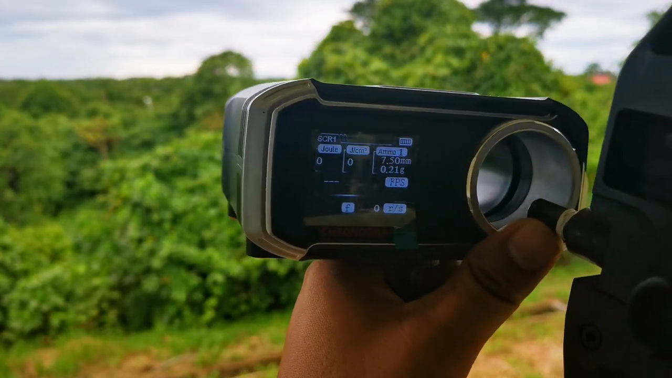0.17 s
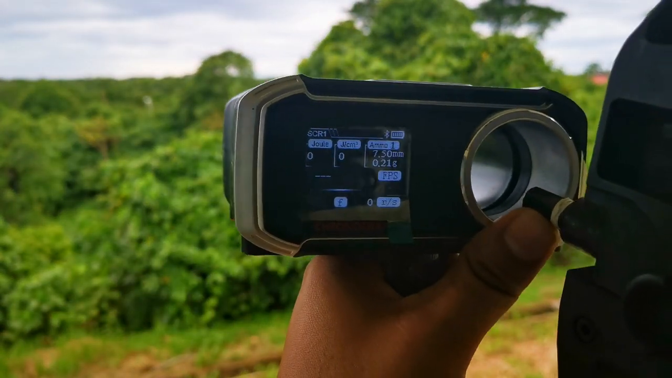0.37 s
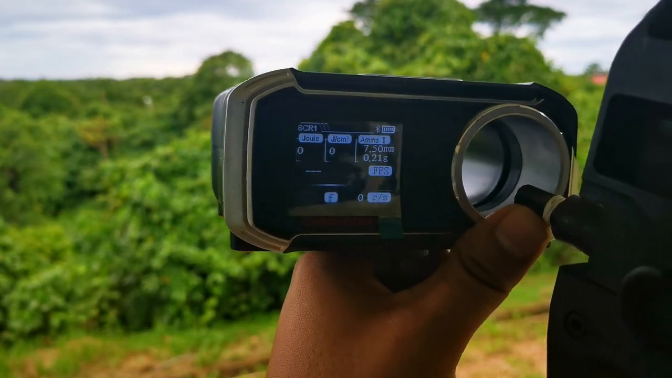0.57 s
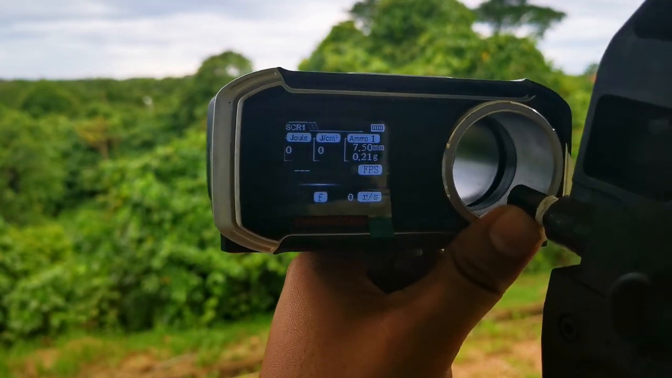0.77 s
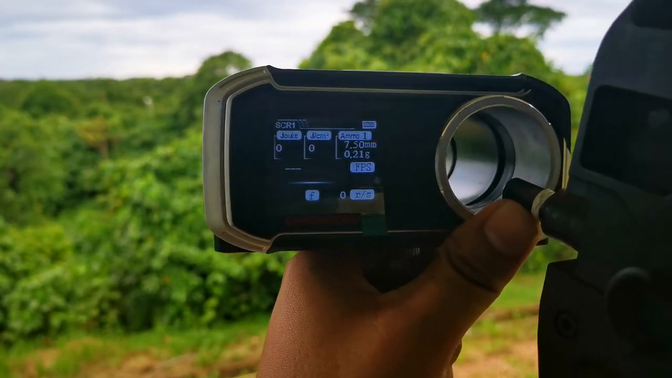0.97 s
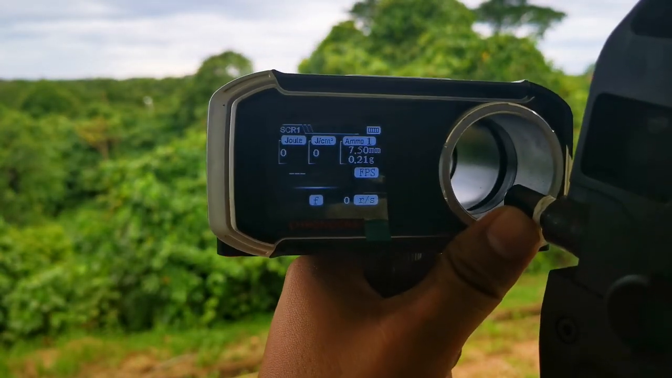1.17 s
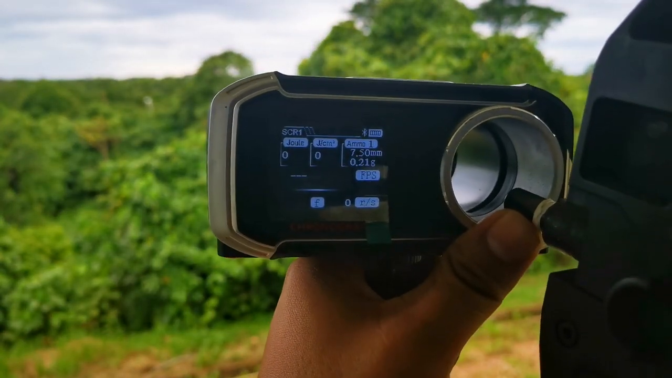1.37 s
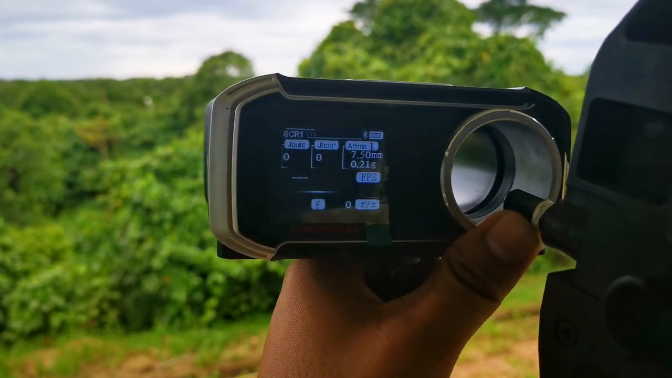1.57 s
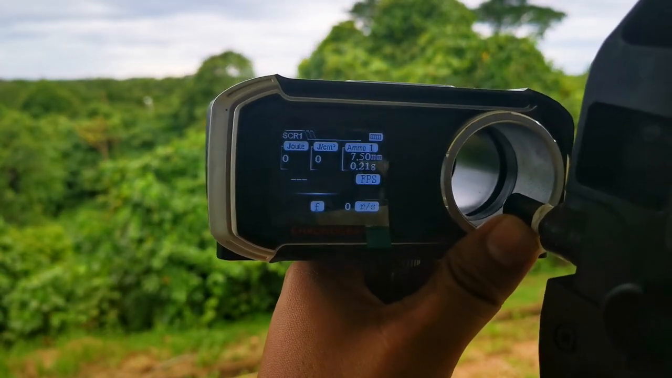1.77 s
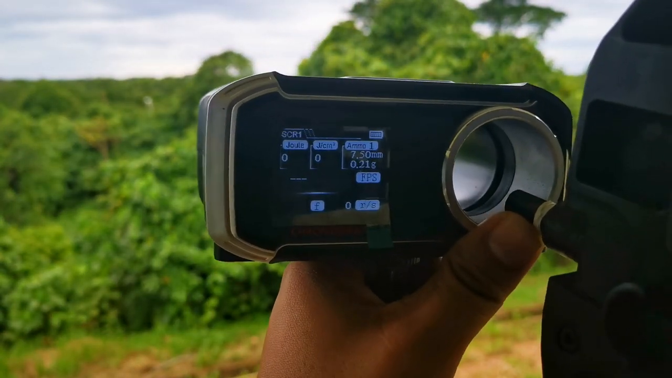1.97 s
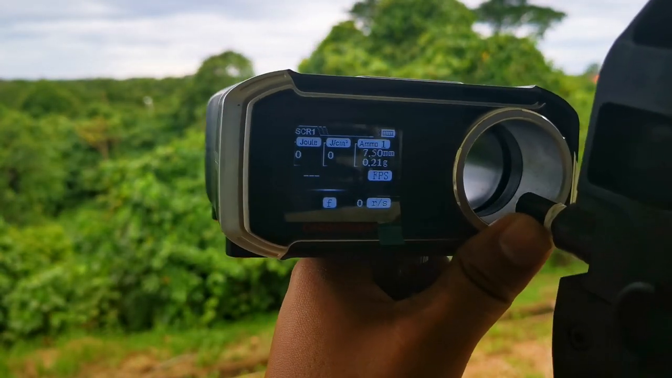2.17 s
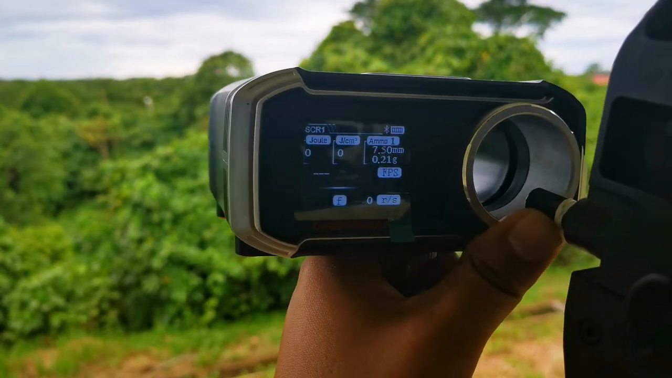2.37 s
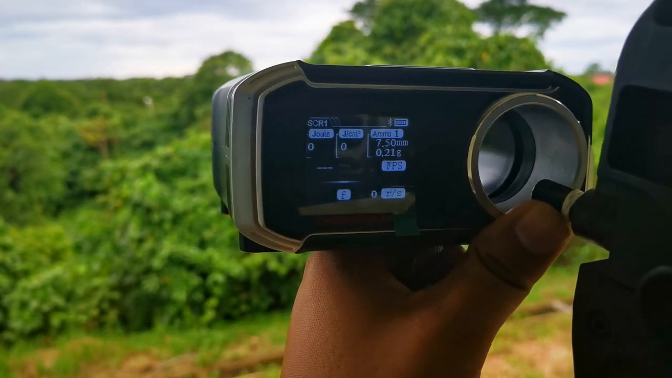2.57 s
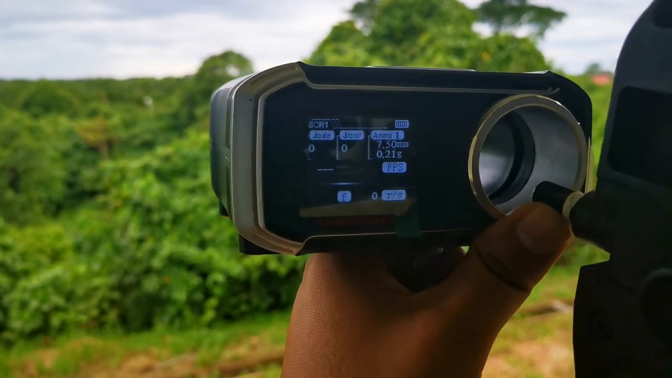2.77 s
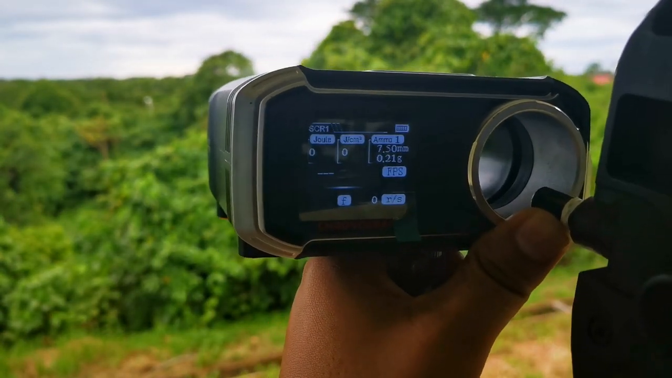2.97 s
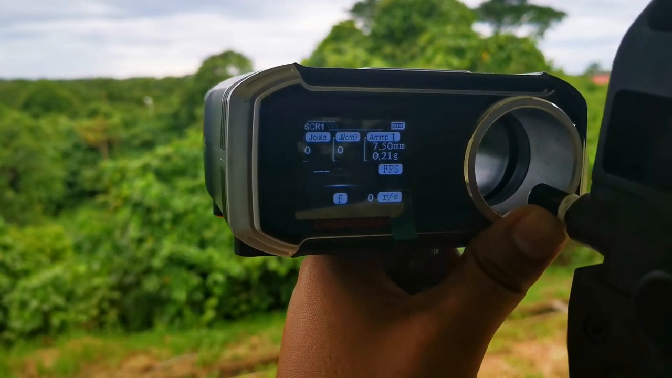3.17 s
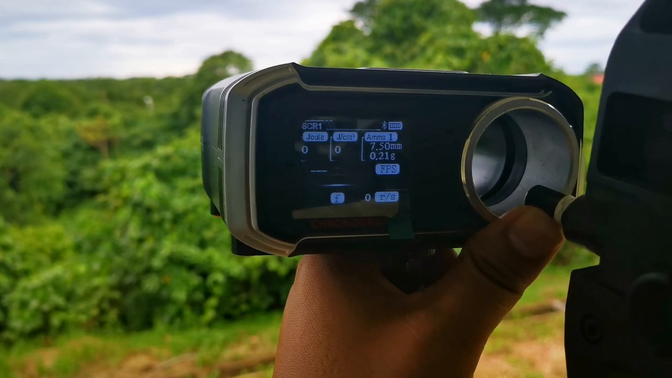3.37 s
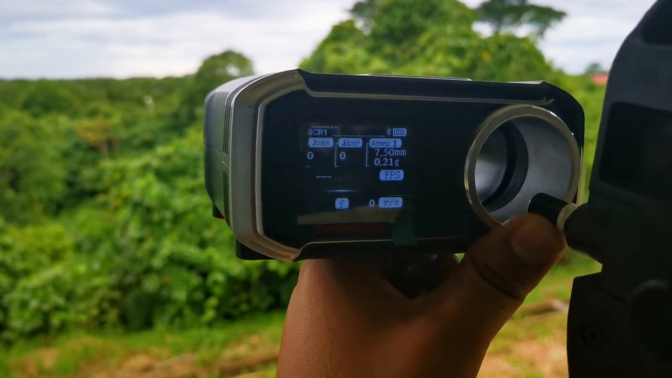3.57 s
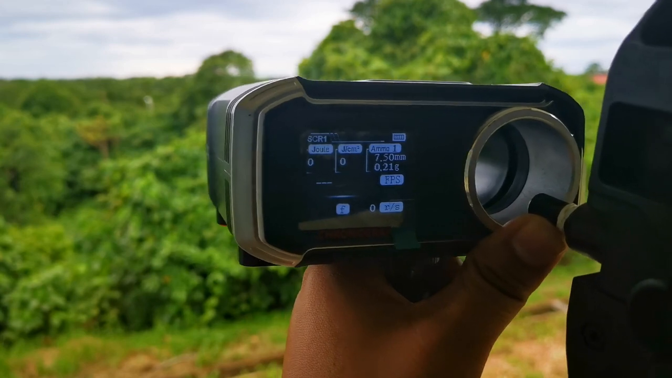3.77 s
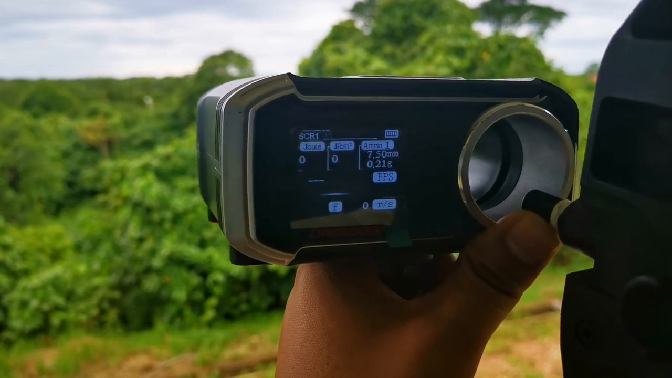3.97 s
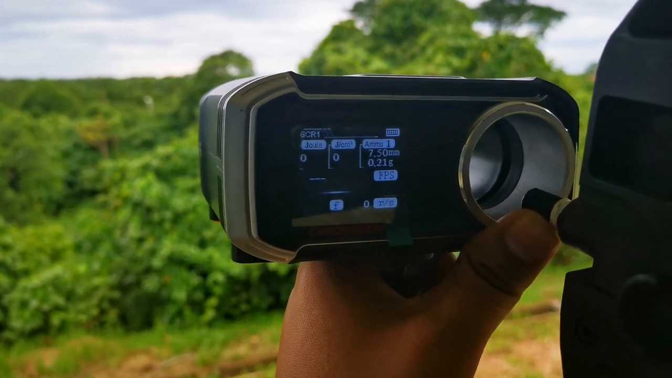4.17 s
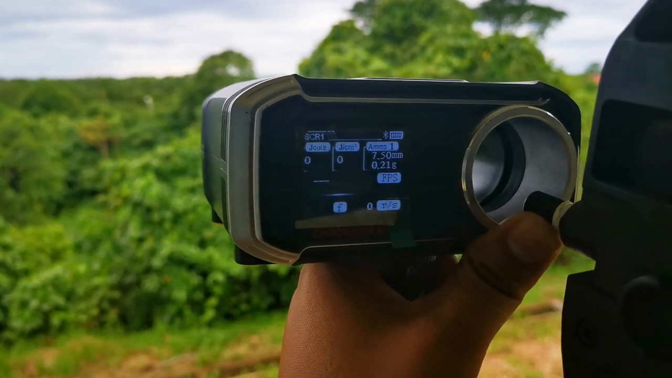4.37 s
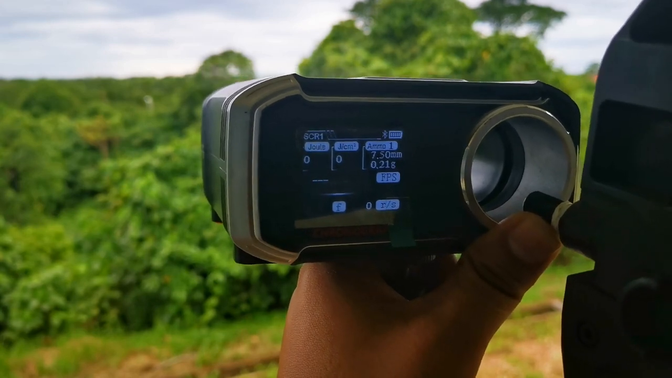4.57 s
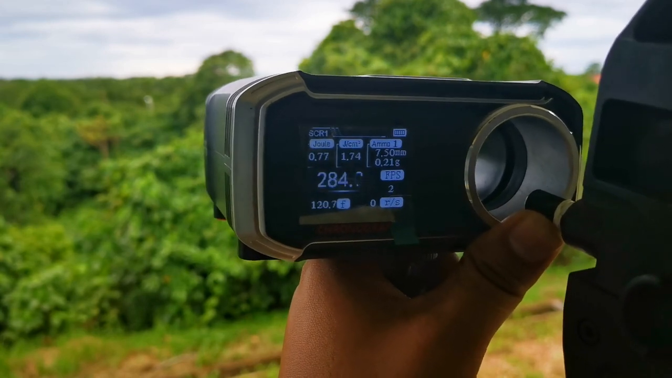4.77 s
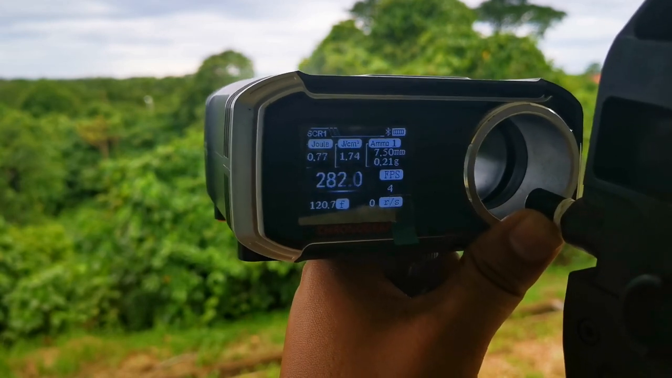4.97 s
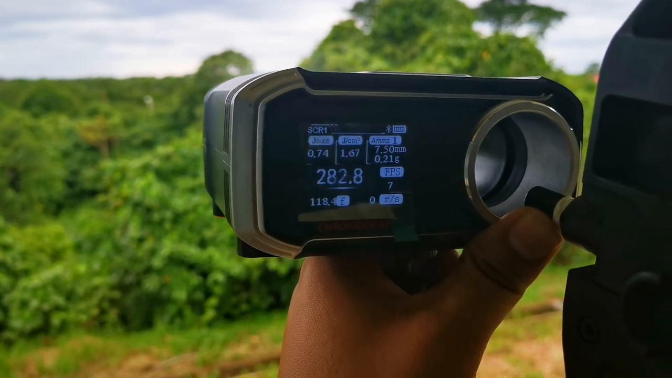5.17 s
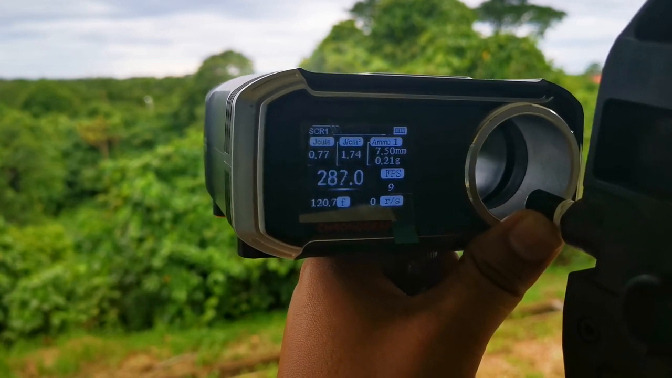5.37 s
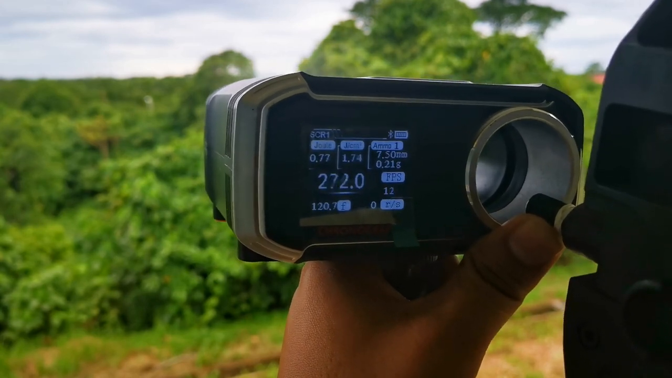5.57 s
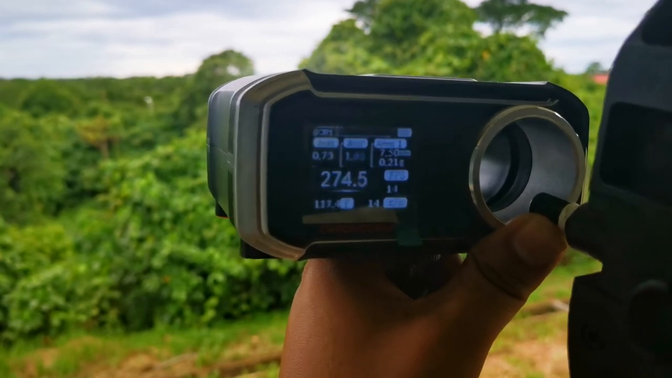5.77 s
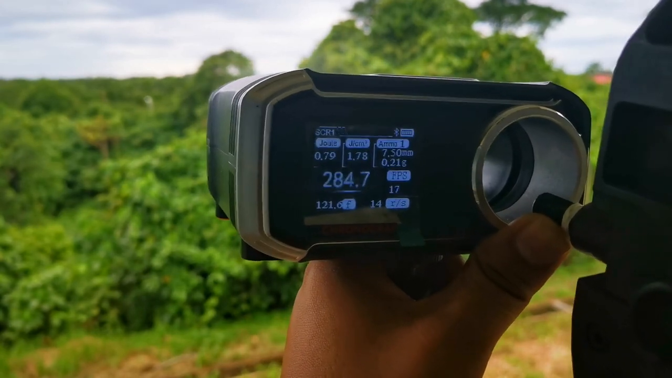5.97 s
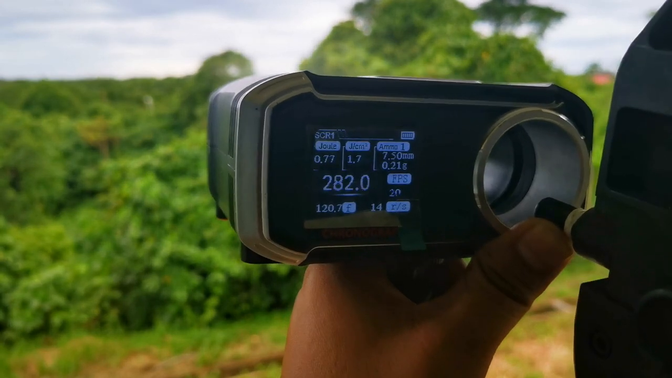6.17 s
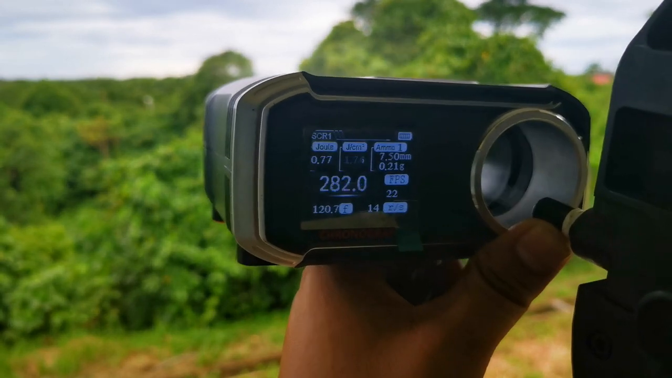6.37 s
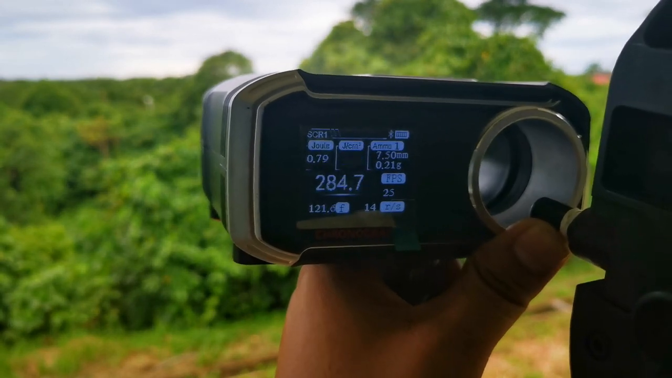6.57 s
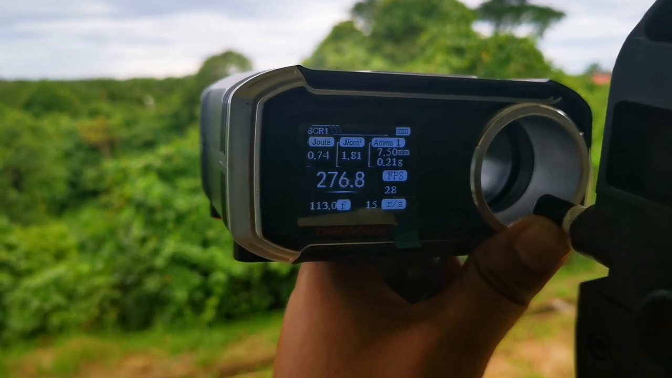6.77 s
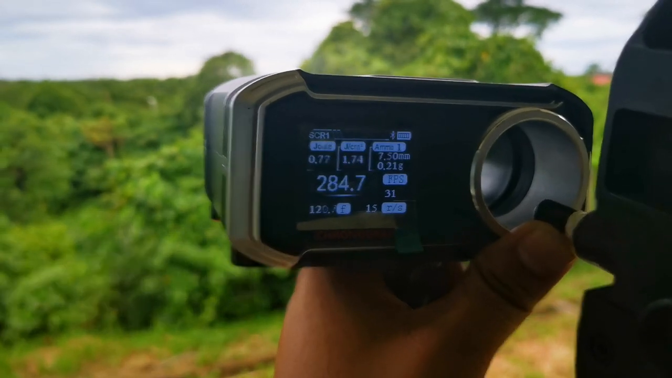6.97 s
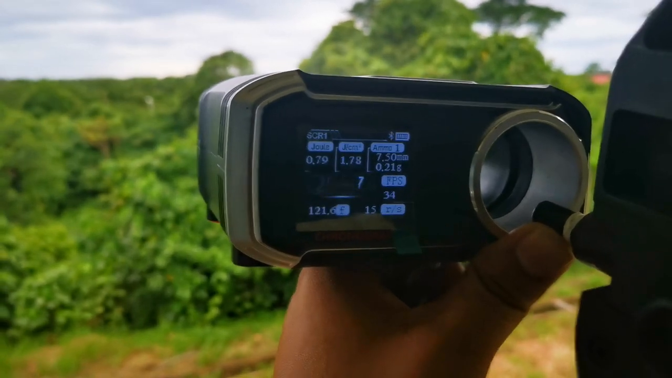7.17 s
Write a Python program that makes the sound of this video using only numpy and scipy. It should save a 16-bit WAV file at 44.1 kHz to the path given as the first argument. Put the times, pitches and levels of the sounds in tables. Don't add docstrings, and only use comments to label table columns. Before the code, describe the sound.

Calm leafy ambience with cicadas and far-off hammering, a few small plastic clicks, then rattling automatic toy blaster fire with whining gears, slightly weakening.

```python
import sys
import numpy as np
from scipy import signal
from scipy.fft import rfft, irfft, next_fast_len
from scipy.io import wavfile
from scipy.ndimage import uniform_filter1d

SR = 44100
rng = np.random.default_rng(int(sys.argv[2]) if len(sys.argv) > 2 else 0)


def volts(x):
    e = np.asarray(x, float) / 20
    return 10 ** e


def unload_audio(sound):
    columns = np.transpose(np.atleast_2d(sound))
    steps = np.round(np.clip(columns, -1, 1) * 32767)
    wavfile.write(sys.argv[1], SR, steps.astype(np.int16))


N = 317961
T = np.arange(N) / SR

# frequency in Hz, level in dB, 60 dB decay in s.
BARREL_MODES = [(2010, 10.5, 0.015), (2910, 8.5, 0.01), (3186, 2, 0.032), (3700, 7, 0.0073),
                (4600, 5, 0.02), (5310, 4.5, 0.023), (7460, -35, 0.021), (7900, -54, .008)]
# frequency in Hz, level in dB, 60 dB decay in s.
EMPTY_BARREL_MODES = [(1840, 5, 0.017), (2100, 12.5, 0.0048), (2894, 3.5, 0.017), (3440, -1.5, 0.028),
                      (5230, -6, 0.0055), (6760, -29, 0.0074)]
# frequency in Hz, level in dB, 60 dB decay in s.
SHELL_MODES = [(250, -22.5, 0.096), (302, -11, 0.082), (401.6, -1, 0.057), (489.3, -8, 0.13),
               (950, 11.5, 0.0054), (1585, -1.5, 0.015), (2280, -6.5, 0.0062)]
# delay after the crack in s, level in dB.
REBOUNDS = [
    (0.0118, -10),
    (0.0222, -27),
    (.048, -14.5),
]
# start in s, level in dB, frequency in Hz, cycles to die.
START_CLICKS = [(4.5083, -20, 5460, 40), (4.5116, -11, 795, 4.4), (4.5126, -12, 800, 7.4),
                (4.515, -12.5, 393, 9.1), (4.5245, -18, 900, 9), (4.5276, -28, 6600, 30),
                (4.529, -14, 1250, 12), (4.5285, -12, 420, 6.7), (4.532, -15.5, 498, 5),
                (4.5308, -12, 850, 6.5), (4.533, -7, 950, 5.5), (4.5372, -12, 1200, 14),
                (4.542, -16, 900, 10), (4.5466, -24, 3300, 20), (4.5465, -10, 323, 5.5),
                (4.5505, -18, 2900, 25)]
# crack time in s, delay to the slam in ms
# (under 2.1 the barrel is empty), then levels of crack, slam and recoil in dB.
OPENING_SHOTS = [
    (4.5549, 1.66, -5, -4, -30),
    (4.6311, 1.444, -5, -5.5, -34),
    (4.6919, 1.7, -8.5, -8, -34),
    (4.7513, 2.6, -12, -10, -28.5),
    (4.8084, 1.28, -8, -7.5, -35),
    (4.866, 1.62, -12, -7.5, -33),
    (4.9246, 2.8, -12.5, -9.5, -28),
    (5.0222, 2.97, -8.5, -8, -28),
    (5.0967, 2.6, -12.5, -9, -27.5),
    (5.1572, 3, -13.5, -9.5, -28),
]
# number of turns, ms per turn.
PACE = [
    (6, 57.62),
    (6, 57.93),
    (5, 57.7),
    (3, 58.0),
    (14, 58.35),
]
# crack, slam, recoil in dB.
STEADY_DB = [-13, -11, -31]
# crack, slam, recoil in dB per s.
SAG_DB_PER_S = [-2.0, -3, -2.5]
# crack in dB, slam in dB.
BALLS = [(-0.7, 2), (1, -1.5), (0.3, 1), (1.2, -1.5), (-1, 0.7), (-1.6, -1.5), (-2.5, .7), (-1, 1.5),
         (-0.6, -1.5), (-2.5, -4), (-3, .4), (-1.6, 0.7), (-.9, 0.5), (-0.9, 1.5), (0.5, 1.5), (-0.5, 1.1),
         (0, 0.7), (-0.8, -2), (-0.5, 1.5), (1.5, -1.5), (.1, 0), (-0.2, 0), (0.8, -5), (0.5, 0.8),
         (-2.5, 2.5), (.1, 2.5), (0, 1), (-3, -6), (1.3, -1.5), (-2.5, 0.7), (-0.5, -3), (0.8, -9), (-1, 3),
         (-1, 3.5), (0.5, 3.5)]
# time in s, gearbox level in dB, speed as a factor.
MOTOR = [(4.506, -60, 0.23), (4.521, -32, .45), (4.549, -22.5, .7), (4.58, -25, .81), (4.62, -27, .87),
         (4.665, -26.5, 0.99), (4.76, -26, .99), (4.941, -27, 0.94), (4.985, -33.5, 0.55),
         (5.03, -25.5, 0.8), (5.085, -27.5, .87), (5.14, -26.5, 0.97), (7.21, -29, 1.07)]
# centre as share of the turn, spread, level in dB.
PINION_LOAD = [(.46, 0.11, 0.5), (.74, 0.089, -3)]
# centre as share of the turn, spread, frequency in Hz, glide in Hz per turn, level in dB.
WHINES = [(.03, 0.049, 1620, 150, -4.5), (.36, .08, 1350, -420, -5.5), (.76, 0.12, 1240, -450, -4.5),
          (.72, 0.13, 950, -330, -6), (.78, 0.041, 2100, -59, -8.5), (0.49, 0.14, 3370, -400, -15.5),
          (.4, 0.096, 850, -300, -10), (0.32, 0.064, 390, -59.5, -3.5)]
# time in s, spread in s, frequency in Hz, level in dB.
GROANS = [
    (4.597, 0.019, 850, -25.5),
    (4.603, .014, 1125, -27.5),
    (4.612, 0.0068, 370, -26),
    (5.066, .016, 1125, -29),
    (5.06, 0.012, 670, -29),
    (5.058, .009, 2000, -29),
    (5.045, .012, 350, -26.5),
]
# frequency in Hz, level in dB per Hz.
GRIND = [(60, -18), (150, -16), (260, -9.5), (450, -7.5), (950, -9.5), (1400, -13), (1700, -9), (2100, -18),
         (3200, -14.5), (3800, -21.5), (6000, -71), (8000, -52)]
# frequency in Hz, level in dB per Hz.
HISS = [(2500, -9), (4000, -6), (5000, -5), (6100, -8.5), (6900, -1), (7700, 0), (8400, -9), (10000, -13),
        (15000, -2)]
# frequency in Hz, phase by which the left leads in radians.
PORT_LEAD = [(60, 0), (1200, -.4), (2100, -.55), (3400, -1.1), (4500, -1.6), (5700, -1.9), (6400, -.3),
             (15000, 0)]
# frequency in Hz, half the left-right difference in dB.
PORT_DB = [(60, 0), (500, 0), (1300, -1.1), (2800, 0.34), (5500, 0.5), (9000, -0.4), (14000, 0.5)]
# start in s, length in s, frequency in Hz, level in dB, width in Hz.
BIRDS = [(1.727, .27, 4000, -80, 9.3), (1.979, .125, 3980, -63.5, 9), (2.0, .08, 4380, -78, 60),
         (2.486, 0.17, 1730, -67.5, 110), (2.761, 0.14, 1570, -59.5, 13), (2.744, 0.11, 3700, -66, 500),
         (2.76, 0.087, 2450, -64, 350), (3.439, 0.13, 1630, -61.5, 110), (3.501, 0.31, 1660, -68, 150),
         (0, 0.53, 920, -64.5, 140), (0, 0.28, 2000, -65, 850), (0.997, 0.26, 2350, -67, 480),
         (3.943, .06, 3960, -71, 30), (4.098, 0.12, 3030, -69, 50), (4.21, .08, 4150, -74, 100)]
# time in s, level in dB, frequency in Hz.
TICKS = [(2.1965, -45, 3700), (2.1973, -50, 3000), (2.198, -49, 4180), (2.207, -56, 4100),
         (2.775, -47, 3900), (2.774, -52, 5200), (2.778, -49, 2500), (3.07, -58, 2300), (3.25, -64, 2300),
         (4.31, -44, 1000), (4.311, -48, 2200), (4.424, -39, 950), (4.424, -38.5, 2480)]
# time in s, level in dB, frequency in Hz.
KNOCKS = [
    (1.3195, -40, 1650),
    (1.3302, -26, 1660),
    (1.3372, -36, 2000),
    (0.9, -47, 1460),
]
# time in s, frequency in Hz.
WING_WHINE = [(0.0, 13620), (0.055, 13740), (0.16, 12660), (0.26, 12900), (0.37, 12030)]
# time in s, knock in dB, wall echo in dB.
BLOWS = [
    (0.002, -49, -54),
    (.12, -75, -67),
    (.31, -63.5, -63),
    (0.436, -52.5, -62.5),
    (0.892, -44, -57),
    (1.03, -64, -76),
    (1.319, -46, -72),
    (1.331, -44, -50.5),
    (2.5, -69, -79),
    (2.764, -60, -69),
]
# frequency in Hz, level in dB per Hz.
BLOW_SPECTRUM = [(290, -54), (500, -17.5), (840, -4), (1410, -1.5), (1680, -1), (1920, -7), (2930, -22),
                 (3160, -19), (5490, -34), (7000, -35), (9100, -57), (15400, -120)]
# frequency in Hz, level in dB per Hz.
ECHO_SPECTRUM = [(1800, -31), (2600, -4), (4000, -7), (6500, -9), (8500, -14), (9200, -60)]
# frequency in Hz, width in Hz, level in dB.
CICADAS = [(7000, 210, -24), (7240, 120, 4), (7576, 630, 9.5), (7880, 37, -5.5), (8090, 160, -13.5)]
# frequency in Hz, level in dB per Hz.
LEAVES = [(59, -43), (100, 1), (156, -3), (247, -7), (480, -10), (560, -16), (838, -18), (1670, -22.5),
          (2300, -27), (4130, -33.5), (4760, -37.5), (6900, -41), (8970, -46), (15200, -120)]
# frequency in Hz, correlation.
LIKENESS = [(60, 0.9), (180, 0.97), (550, 0.92), (1650, 0.83), (4970, 0.13), (15000, 1)]
# frequency in Hz, width in Hz, level in dB; the first is the drone.
HUMS = [(153.3, 7.9, -9), (228, 3.7, -11.5), (296.7, 8.6, -10), (441.3, 13, -9)]
# time in s, spread in s, frequency in Hz, level in dB.
SWELLS = [
    (.3, 0.19, 79.6, -59.5),
    (.9, 0.088, 154.5, -57.5),
    (1.65, 0.1, 153.3, -55),
    (2.071, .07, 150.8, -47.5),
    (2.349, .2, 228.3, -56.5),
    (3.05, 0.076, 144.6, -53),
    (3.66, .08, 150.4, -60),
    (4.0, .12, 142.5, -54),
    (4.27, .06, 170, -49.5),
]
# time in s, level in dB.
GUSTS = [(.1, -65), (.88, -70), (1.1, -64), (1.75, -67), (1.94, -64), (2.18, -68), (2.45, -67), (3.12, -62),
         (3.5, -68), (3.88, -62), (4.05, -64), (4.27, -58), (4.42, -61)]
# frequency in Hz, gain in dB.
FIELD_TREBLE = [(20, 0), (8450, 0), (8900, -25), (16000, -40)]
# frequency in Hz, gain in dB.
MICROPHONE = [(20, -1), (8200, -0.5), (9500, -5.5), (11000, -13.5), (15000, -26.5), (15600, -32),
              (15900, -76)]

STEADY_S = 5.2157
RUSH_FROM, PUFF_FADE = 0.914, 0.029
PINION_HZ, PINION_SAG_HZ, PINION_FREE = 1722, 680, .3
MUZZLE_S, MUZZLE_DB = 0.00013, -0.5
JOLT_HZ, JOLT_DB, FIRST_JOLT_DB, BRACED_S = 43.4, -17, 12, .4
DROOP_HZ = 25


def evened(x):
    return x / np.sqrt(np.mean(x ** 2) + 1e-20)


def read(points, hz):
    f, value = np.transpose(points)
    return np.interp(np.log(hz + 1), np.log(f + 1), value)


def add(mix, s, sound):
    part = mix[round(s * SR):][:len(sound)]
    part += sound[:len(part)]


def bump(x, centre, spread):
    return np.exp(-.5 * ((x - centre) / spread) ** 2)


def colour(x, points):
    size = next_fast_len(x.shape[-1])
    gain = volts(read(points, np.fft.rfftfreq(size, 1 / SR)))
    return evened(irfft(rfft(x, size) * gain, size)[..., :x.shape[-1]])


def resonate(x, hz, width):
    turn = np.exp(2j * np.pi * np.cumsum(hz * np.ones(len(x))) / SR)
    r = np.exp(-np.pi * width / SR)
    return 2 * (turn * signal.lfilter([1 - r], [1, -r], x / turn)).real


def ring(modes, detune, scatter_db, rise):
    t = T[:2400]
    hz, db, t60 = np.transpose(modes)[:, :, None]
    luck = rng.standard_normal((2, len(modes), 1))
    decay = volts(db + scatter_db * luck[0] - 60 * t / t60)
    x = (decay * np.cos(2 * np.pi * hz * (1 + detune * luck[1]) * t)).sum(0)
    x = x * (1 - np.exp(-(t + 1 / SR) / rise))
    return x / abs(x).max()


def wander(rate):
    width = int(SR / rate)
    return evened(uniform_filter1d(uniform_filter1d(rng.standard_normal(N), width), width))


def wide(points, patchy_db, size=N):
    frames, hz = size // 256 + 5, np.fft.rfftfreq(1024, 1 / SR)
    a, b, c, d, patches = rng.standard_normal((5, frames, 513), dtype=np.float32)
    patches = evened(uniform_filter1d(uniform_filter1d(patches, 8, 1), 14, 0))
    same = np.clip(read(LIKENESS, hz), -1, 1).astype(np.float32)
    left = a + 1j * b
    z = np.array([left, same * left + np.sqrt(1 - same ** 2) * (c + 1j * d)])
    z = z * volts(read(points, hz) + patchy_db * patches).astype(np.float32)
    return evened(signal.istft(z, nperseg=1024, noverlap=768, time_axis=1, freq_axis=2)[1][:, :size])


def firing():
    turns, ms = np.transpose(PACE)
    s = STEADY_S + np.cumsum(np.r_[0, np.repeat(ms, turns.astype(int))]) / 1000
    luck = rng.standard_normal((len(s), 2))
    db = STEADY_DB + np.outer(s - s[0], SAG_DB_PER_S) + np.c_[BALLS, .3 * luck[:, 0]]
    return np.r_[OPENING_SHOTS, np.c_[s, 3.15 + .25 * luck[:, 1], db]]


def shots(rows):
    out, t = np.zeros(N), T[:4000]
    swing = np.sin(2 * np.pi * 120.5 * t) - .45 * np.sin(2 * np.pi * 157 * t)
    swing = swing * np.minimum(t / .011, 1) ** 2 * volts(-60 * np.maximum(t - .016, 0) / 0.094)
    muzzle = (1 - t / MUZZLE_S) * np.exp(-t / MUZZLE_S)
    for s, gap_ms, crack_db, slam_db, recoil_db in rows:
        empty = gap_ms < 2.1
        if empty:
            barrel = -ring(EMPTY_BARREL_MODES, 0.037, 1.2, .00004)
        else:
            barrel = ring(BARREL_MODES, 0.026, 0.96, .00002)
            gap_ms = np.clip(gap_ms, 2.7, 3.5)
        add(out, s - .0154, volts(recoil_db + .5) * swing)
        add(out, s - .00004, volts(crack_db + 3.5) * barrel)
        add(out, s - .00004, volts(crack_db + MUZZLE_DB - 40 * empty) * muzzle)
        add(out, s + .0012, volts(crack_db - 6) * ring(BARREL_MODES, .03, 2.5, .00005))
        add(out, s + gap_ms / 1000 - .00015, volts(slam_db + 3) * ring(SHELL_MODES, .008, 1.2, .0001))
        for late, db in REBOUNDS:
            add(out, s + late, volts(slam_db + 3 + db - 5 * empty) * ring(SHELL_MODES, .01, 1.5, .0006))
    return out


def start_clicks():
    out = np.zeros(N)
    for s, db, hz, cycles in START_CLICKS:
        t60 = cycles / hz
        modes = [(hz, 0, t60), (hz * 1.3, -5, t60), (hz * 0.55, -16, t60), (hz * 2.6, -15, t60 / 2)]
        add(out, s, -volts(db) * ring(modes, .01, 1, 0.0004))
    return out


def gear_tones(share, pace):
    load = volts(0.89 * wander(40) - 1.5 * (T - STEADY_S))
    mesh_hz = (PINION_HZ - PINION_SAG_HZ * (share - PINION_FREE) ** 2) * pace
    pinion_level = sum(volts(db) * bump(share, at, spread) for at, spread, db in PINION_LOAD)
    whine = pinion_level * np.sin(2 * np.pi * np.cumsum(mesh_hz) / SR)
    for at, spread, hz, glide, db in WHINES:
        phase = 2 * np.pi * np.cumsum((hz + glide * (share - at)) * pace) / SR
        whine = whine + volts(db) * bump(share, at, spread) * np.sin(phase)
    return load * whine


def groans():
    out = np.zeros(N)
    for s, spread, hz, db in GROANS:
        bent = T - 2 * (T - s) ** 3 / spread / 20
        out += volts(db) * bump(T, s, spread) * np.sin(2 * np.pi * hz * bent)
    return out


def tooth_rattle():
    strength = volts(2.4 * np.minimum(rng.exponential(1, (3, N)), 4))
    return (rng.random((3, N)) < 9000 / SR) * strength * rng.choice([-1, 1], (3, N))


def gearbox(s):
    share = np.interp(T, np.r_[s[0] - .046, s, s[-1] + .058], np.arange(len(s) + 2)) % 1
    rush = np.clip((share - RUSH_FROM) / (1 - RUSH_FROM), 0, 1) ** .5
    puff = np.exp(-share / PUFF_FADE)
    grind_db = 1 - 8 * bump(share, 0.2, 0.011) + 6 * rush ** 4 - 1.5 * bump(share, 0.72, 0.072)
    hiss_db = 10.5 - 6.5 * share + 6 * rush + 3 * puff
    when, level_db, speed = np.transpose(MOTOR)
    pace = np.interp(T, when, speed) * (1 + .003 * wander(100))
    whine = gear_tones(share, pace)
    teeth = tooth_rattle()
    worn = teeth[2, (share * 2560).astype(int)]
    aside = signal.lfilter(*signal.butter(2, 1500, "high", fs=SR), teeth[1])
    loose = teeth[0] + .75 * aside * [[1], [-1]]
    loose = signal.lfilter(*signal.butter(1, 450, "high", fs=SR), loose)
    grind = volts(grind_db - 3.5) * colour(loose + .7 * worn, GRIND)
    air_noise = rng.standard_normal(N) + .85 * rng.standard_normal((2, N))
    hiss = volts(hiss_db - 8.5 + 1.8 * wander(220)) * colour(air_noise, HISS)
    effort = volts(np.interp(T, when, level_db)) * (T > when[0])
    return effort * (whine + grind + hiss) + groans()


def nearby(x):
    size, t = next_fast_len(N), T[:14000]
    hz = np.fft.rfftfreq(size, 1 / SR)
    ports = np.exp(np.outer([1, -1], .5j * read(PORT_LEAD, hz) + np.log(volts(read(PORT_DB, hz)))))
    bass_cut = 1 / np.sqrt(1 + (88 / (hz + 1)) ** 6)
    direct = irfft(rfft(x, size) * ports * bass_cut, size)[:, :N]
    tail = rng.standard_normal((2, len(t))) * volts(-47.5 - 60 * t / 0.42) * (t > .004)
    tail = signal.lfilter(*signal.butter(1, 900, "high", fs=SR), tail)
    return direct + signal.fftconvolve(x, tail, axes=1)[:, :N]


def jolts(rows):
    out, t = np.zeros(N), T[:int(SR / JOLT_HZ)]
    cycle = np.hanning(len(t)) * np.sin(2 * np.pi * JOLT_HZ * t)
    for s, *_, recoil_db in rows:
        unbraced_db = FIRST_JOLT_DB * np.exp((rows[0, 0] - s) / BRACED_S)
        add(out, s - .012, volts(recoil_db + JOLT_DB + unbraced_db) * cycle)
    return out


def finger_ticks():
    out = np.zeros(N)
    for s, db, hz in TICKS:
        modes = [(hz, 0, .012), (hz * 0.89, -2, .008), (min(hz * 2.47, 6000), -18, .006),
                 (hz * 5, -20, .004), (hz * 0.55, -3, .005)]
        add(out, s, volts(db - 4.5) * ring(modes, 0.018, 1.4, .0001))
    return out


def wing_whine():
    s, hz = np.transpose(WING_WHINE)
    turns = 2 * np.pi * np.cumsum(np.interp(T, s, hz)) / SR
    fade = volts(-51 - 37 * T) * np.clip((s[-1] - T) / .02, 0, 1)
    return fade * np.sin(turns + .35 * np.sin(turns / 32))


def birds():
    out = np.zeros(N)
    for s, length, hz, db, width in BIRDS:
        size = int(length * SR)
        pitch_hz = hz + DROOP_HZ * (1500 / hz) ** 2 * np.linspace(1, -1, size)
        note = resonate(rng.standard_normal(size), pitch_hz, width)
        note = note / (uniform_filter1d(abs(note), 300) + 0.6 * abs(note).mean())
        note = resonate(note, pitch_hz, max(width, 300))
        add(out, s, volts(db) * evened(note) * np.sin(np.pi * np.linspace(0, 1, size) ** 0.55))
    return out


def hammer_knocks():
    out = np.zeros(N)
    for s, db, hz in KNOCKS:
        modes = [(hz, 0, .008), (hz * .84, -6, .007), (hz * 1.2, -9, .007)]
        add(out, s, volts(db) * ring(modes, .01, .7, .002))
    return out


def hammer():
    t, half = T[:30000], N // 2
    (dull, bright), out = np.zeros((2, half)), np.zeros((2, N))
    wash = (volts(-60 * t / 0.0064) + volts(-0.5 - 60 * t / 0.64)) * np.minimum(t / 0.0041, 1)
    for s, db, echo_db in BLOWS:
        add(dull, s, volts(db) * wash)
        add(bright, s, volts(echo_db - 60 * t / 0.7) * np.minimum(t / 0.035, 1))
    out[:, :half] = dull * wide(BLOW_SPECTRUM, 0.3, size=half) + bright * wide(ECHO_SPECTRUM, 0.96, size=half)
    return out


def insects():
    clicks = rng.standard_normal((3, N)) * volts(wander(360))
    clicks = 0.83 * clicks[2] + 0.6 * clicks[:2]
    hz = np.linspace(6000, 9500, num=351)
    gain = np.zeros(len(hz))
    for centre, width, db in CICADAS:
        gain += volts(db) * np.sqrt(200 / width) / (1 + (2 * (hz - centre) / width) ** 2) ** 1.45
    chorus = colour(clicks, np.c_[hz, 20 * np.log10(gain)])
    beat = np.cos(2 * np.pi * 6.85 * (T - 3.025))
    throb = np.maximum(beat + .8, 0) ** .55 * np.clip(T / 3.3, .2, 1)
    chirp = colour(clicks, [(4800, -48), (5500, -13), (5800, 0), (6050, -24), (6800, -52)])
    return volts(-54 + .4 * wander(3)) * chorus + volts(-81.0) * throb * chirp


def air():
    drone, *hums = (volts(db) * evened(resonate(rng.standard_normal(N), hz, width)) for hz, width, db in HUMS)
    drone = evened(drone / (uniform_filter1d(abs(drone), 3000) + .4))
    breeze = wide([(15, -4.5), (40, -7.5), (80, -31), (110, -51), (300, -84)], 0.92)
    gusts = volts(-61.5) + sum(volts(db) * bump(T[::64], s, 0.026) for s, db in GUSTS)
    lows = volts(-60) * drone + volts(-59.0) * sum(hums) + np.repeat(gusts, 64)[:N] * breeze
    for s, spread, hz, db in SWELLS:
        t = T[:int(4 * spread * SR)]
        rev = volts(db) * np.hanning(len(t)) * np.sin(2 * np.pi * hz * t)
        add(lows.T, max(s - 2 * spread, 0), rev[:, None])
    return (volts(-57) * wide(LEAVES, 1.2) + lows) * volts([[-.7], [.7]])


def scene():
    rows = firing()
    blaster = nearby(shots(rows) + start_clicks() + gearbox(rows[:, 0])) + jolts(rows)
    small_sounds = finger_ticks() + wing_whine() + birds() + hammer_knocks()
    field = hammer() + insects() * volts([[-.7], [.7]]) + air()
    field = np.sqrt(np.mean(field ** 2)) * colour(field, FIELD_TREBLE)
    ducking = volts(np.interp(T, [4.51, 4.6], [0, -9]))
    return blaster + small_sounds + field * ducking


def low_pass(x):
    return signal.sosfilt(signal.butter(12, 16090, fs=SR, output="sos"), x)


def record(dry):
    size = next_fast_len(N)
    response = volts(read(MICROPHONE, np.fft.rfftfreq(size, 1 / SR)))
    heard = irfft(rfft(dry, size) * response, size)[:, :N]
    heard = heard + volts(-94) * wide([(10000, -40), (12000, -4), (14800, 0), (15400, -40)], 3)
    heard = 1.65 * np.tanh(heard / 1.556)
    return low_pass(heard)


dry = scene()
out = record(dry)
unload_audio(out)
```